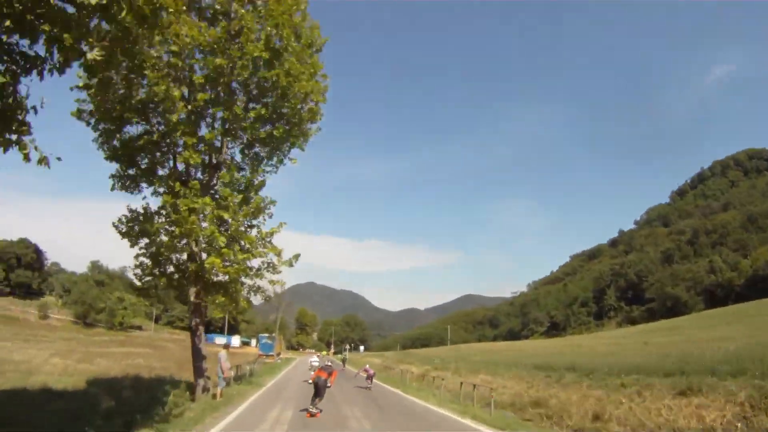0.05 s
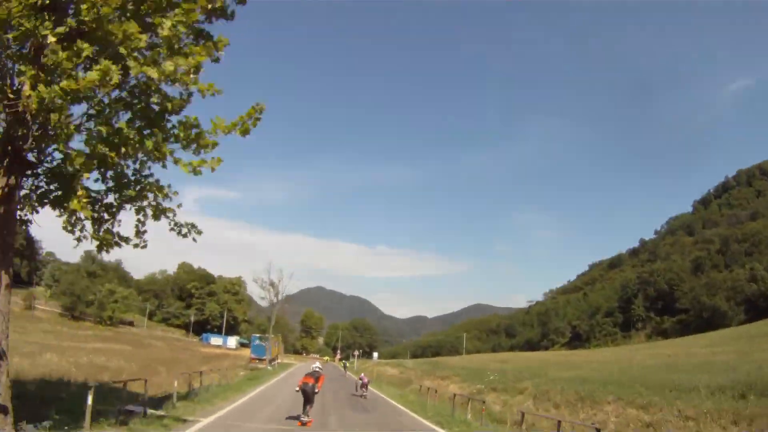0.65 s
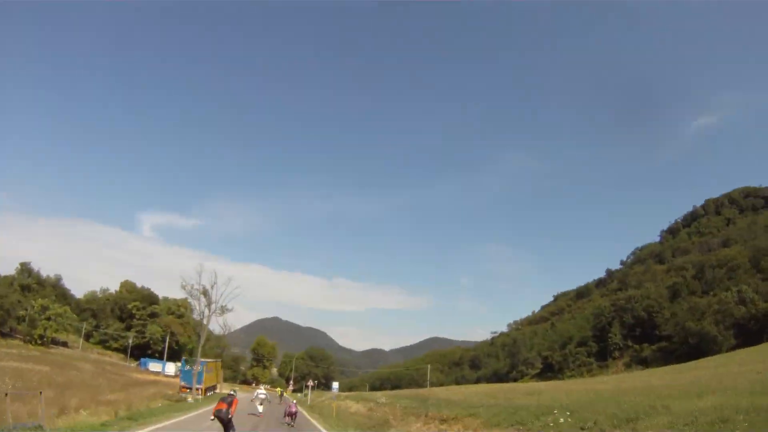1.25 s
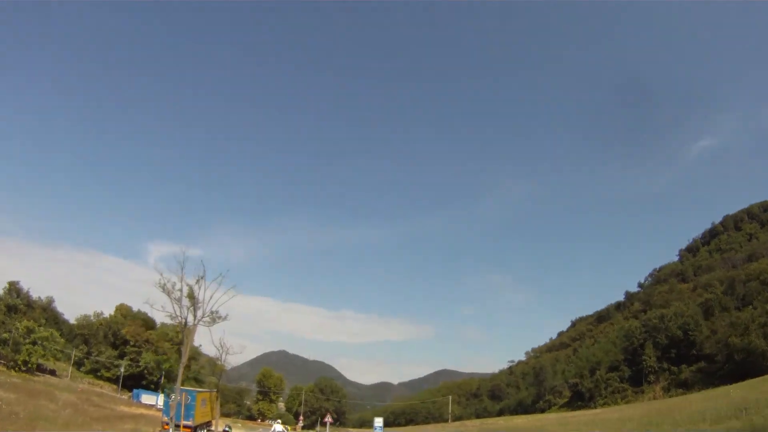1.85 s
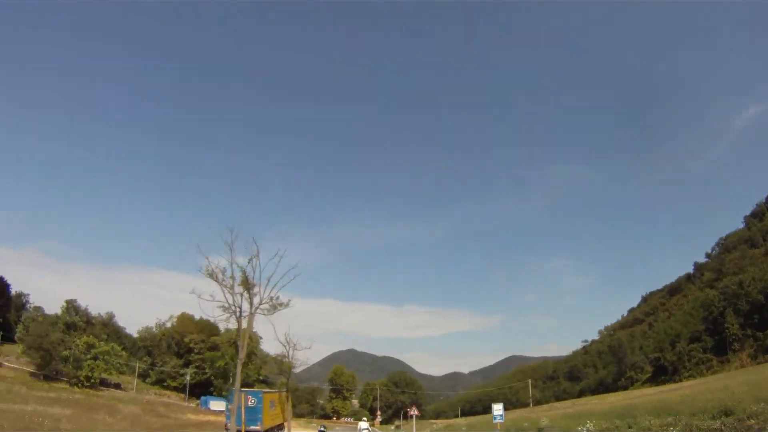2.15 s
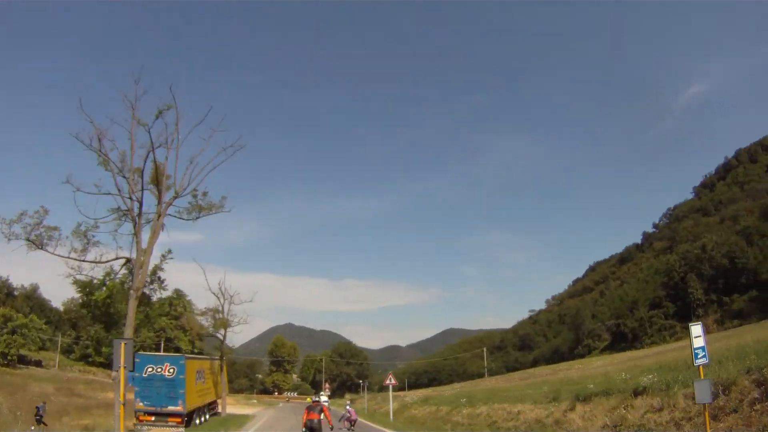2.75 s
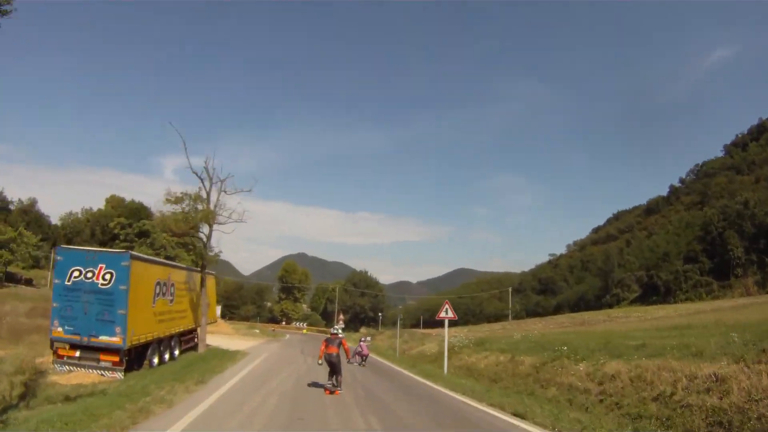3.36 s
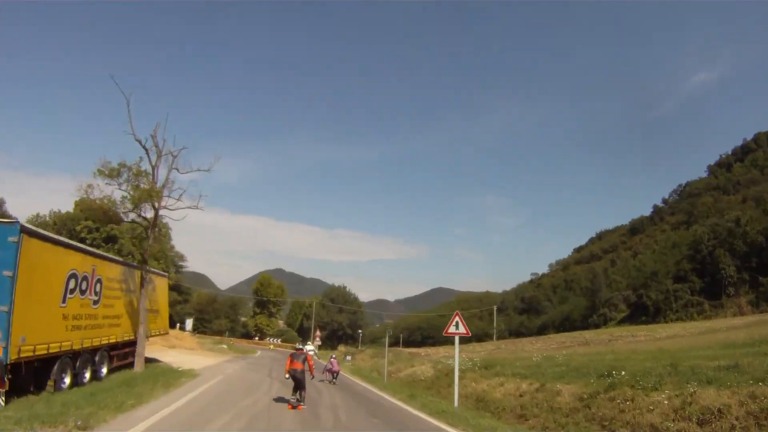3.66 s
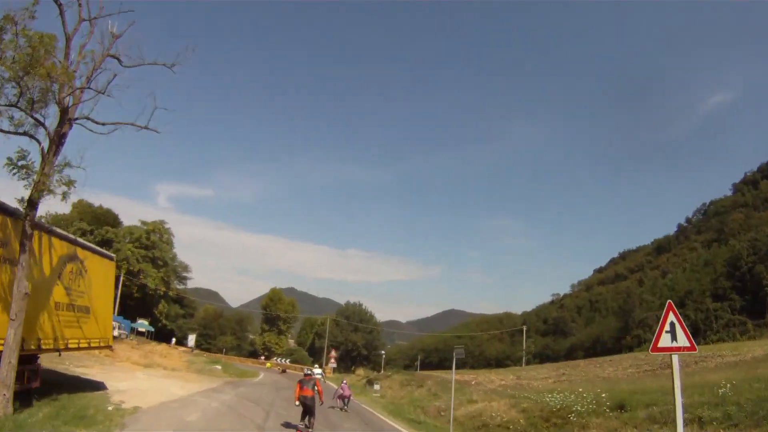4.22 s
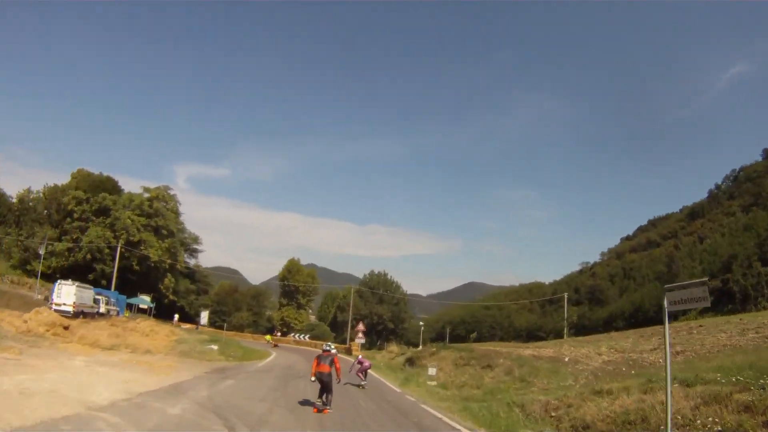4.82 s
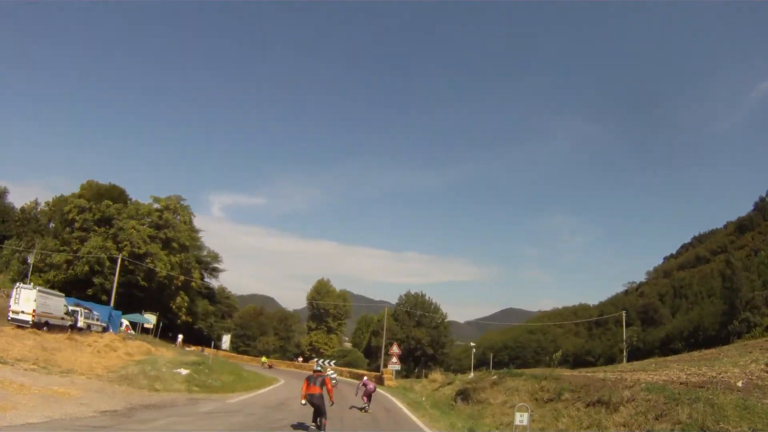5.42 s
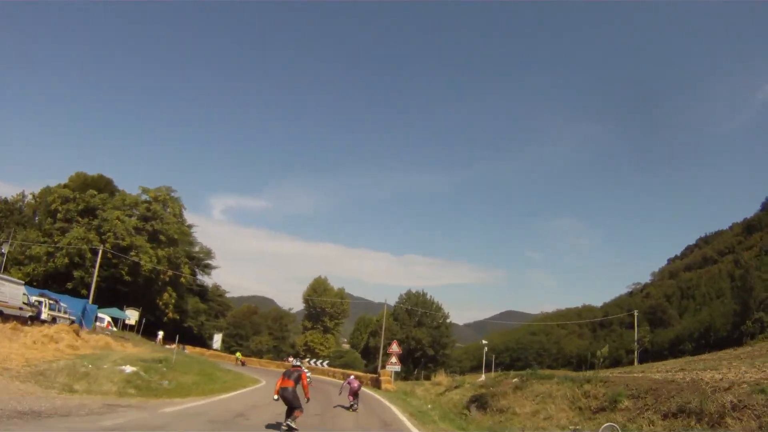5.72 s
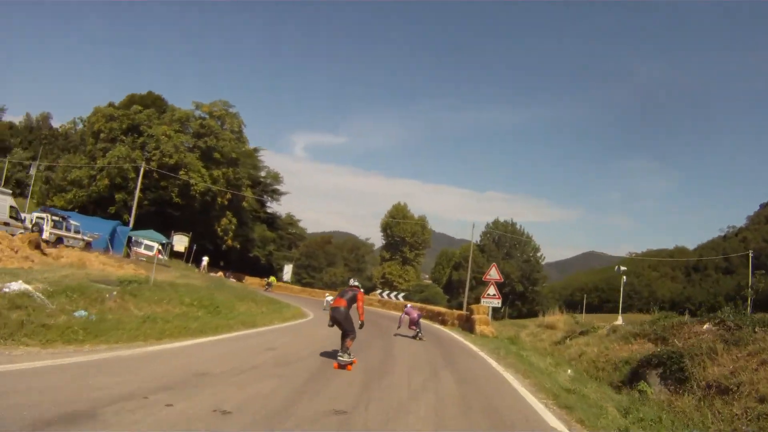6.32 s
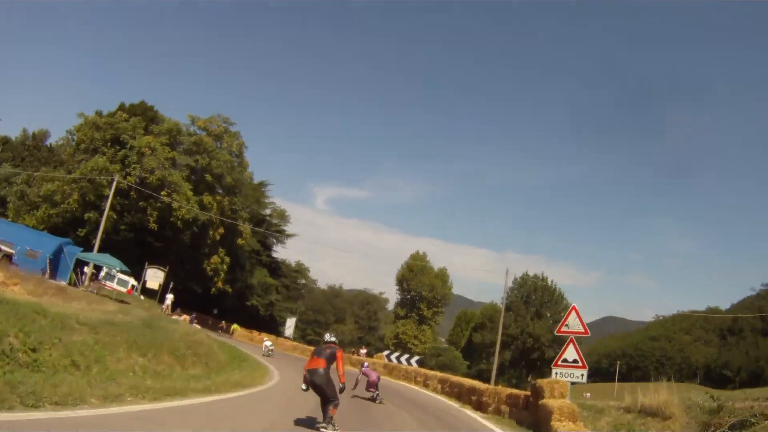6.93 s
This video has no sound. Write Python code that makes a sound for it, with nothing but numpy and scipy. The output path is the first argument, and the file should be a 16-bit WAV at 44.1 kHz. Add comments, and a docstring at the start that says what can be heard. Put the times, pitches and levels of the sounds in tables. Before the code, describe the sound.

Longboard wheels roar and patter down coarse asphalt with rushing wind and a rattling camera case, slowing into a bend.

```python
"""Longboard wheels roar and patter on coarse asphalt, downhill, slowing and scrubbing into a bend.
Road grain and stones ring the case of a camera riding along. Shaken on its mount, the loose case
buzzes in spells and once clacks hard. Wheels and wind hiss through the air; a faint band of wheel
noise sings before the bend. Wind buffet and the jolting ride rumble underneath."""
import sys
import numpy as np
from scipy import signal
from scipy.fft import rfft, irfft, next_fast_len
from scipy.io import wavfile
from scipy.ndimage import map_coordinates

SR = 44100
rng = np.random.default_rng(int(sys.argv[2]) if len(sys.argv) > 2 else 0)


def generate_wav(signal):
    """Clip the signal to [-1, 1] and save it as 16-bit WAV at the path in sys.argv[1]."""
    frames = np.transpose(np.atleast_2d(signal))
    scaled = np.clip(frames, -1, 1) * 32767
    pcm = np.round(scaled).astype(np.int16)
    wavfile.write(sys.argv[1], SR, pcm)


N = 312228

# board speed: t/s, share of top speed
SPEED = [(0, 1), (0.8, 0.8), (1.7, 0.98), (2.5, 0.95), (3.1, 0.89), (3.5, 0.79), (4.2, 0.77), (5.0, 0.58),
         (5.8, 0.49), (6.5, 0.42), (7.08, 0.42)]
# case resonances: f/Hz, width/Hz, lift/dB at ring=1
CASE_MODES = [(759.6, 32, 9), (848, 54, 2.5), (1116, 250, 4), (1358, 164, 4.5), (1608, 128, 7.5),
              (1955, 353, 11), (2377, 357, 11.5), (2898, 132, 9.5), (3480, 810, 6.5), (3729, 166, 11),
              (4240, 375, 8.5), (4806, 370, 6.5), (5180, 280, 4), (6870, 326, 3.5), (7230, 520, 5.5),
              (7757, 330, 10), (8270, 183, 13.5), (8624, 590, 8.5), (9080, 170, 7), (9600, 270, 8.5),
              (10060, 400, 7), (10730, 940, 9.5), (14000, 308, 4), (14392, 214, -1), (14901, 159, 2),
              (15203, 256, -5)]
# camera treble dips: f/Hz, half width/Hz, depth/0-1
TREBLE_DIPS = [(5990, 276, 0.74), (11766, 1380, 0.99)]

# source spectra: f/Hz, relative level/dB
BUFFET_SPECTRUM = [(10, -33), (24, -19), (38, -1.5), (52, -14.5), (80, -18.5), (200, -34), (600, -105)]
RIDE_SPECTRUM = [(35, -17), (65, -5.5), (90, -2), (120, 1.5), (160, 2), (205, -2), (246, 3), (290, -8),
                 (400, -17), (700, -27.5), (2000, -82)]
HISS_SPECTRUM = [(300, -32.5), (700, -16), (1000, -22), (2000, -7.5), (2750, -20), (3550, 0.5), (4400, -23),
                 (5600, -11), (6500, -12), (7600, -29), (8400, -8), (9300, -22), (11000, -14.5),
                 (15200, -24.5)]
SCRUB_SPECTRUM = [(500, -28), (1100, -16), (1450, 3), (1900, 10), (2200, -20), (2900, -21), (5000, -25),
                  (10000, -42)]
CLACK_SPECTRUM = [(150, -33), (550, -14), (1000, -2), (1500, -11), (2500, -2), (4100, 4), (6000, -2.5),
                  (8000, -5), (10500, -17), (15000, -15)]
RATTLE_SPECTRUM = [(200, -25), (650, -24), (1400, 0.5), (2200, -14), (3200, -3.5), (4500, -2.5),
                   (5300, -2.5), (5800, -3.5), (7000, -4.5), (10000, -20), (13500, -15.3), (15200, -6)]
ROAR_SPECTRUM = [(150, -35.5), (330, -4), (650, -10), (900, 0.5), (1400, -0.9), (2200, -14.5), (3200, -11),
                 (5000, -36), (9000, -43)]
GRIT_SPECTRUM = [(200, -35), (330, -24), (650, -15), (900, -5), (1400, 0.5), (2200, -3.5), (3200, -2.5),
                 (4500, -9), (7000, -14), (10000, -11), (13500, -8.5), (15200, -5)]

# wind gusts, road heaves, sideways slips: t/s, half length/s, level/dB
GUSTS = [(0.0, 0.11, -28.5), (0.36, .14, -31), (0.96, 0.13, -32), (1.76, .06, -34), (2.02, 0.087, -32),
         (2.52, 0.065, -32), (3.19, .06, -37), (3.61, 0.066, -28.5), (4.2, 0.15, -41), (4.6, .05, -39),
         (7.07, 0.023, -30)]
HEAVES = [(1.0, 0.46, -42), (1.73, .08, -36), (2.46, 0.29, -33), (3.18, 0.12, -35), (4.08, .08, -37.5),
          (5.1, 0.8, -45.5)]
SCRUBS = [(4.81, 0.03, -42), (5.98, 0.05, -35.5), (6.523, 0.044, -32), (6.66, .05, -36),
          (6.757, 0.046, -33), (6.85, 0.045, -34), (6.99, .044, -37)]
# airborne hiss: t/s, level/dB
HISS_LEVEL = [(0.0, -23.5), (1.0, -27), (1.7, -31), (2.5, -29.5), (4.0, -39.5), (5.2, -33), (6.3, -35),
              (7.08, -35.5)]
# singing band: t/s, f/Hz, level/dB
SING_TRACK = [(4.7, 1200, -60), (5.0, 1156, -42), (5.2, 1112, -45), (5.45, 1065, -45), (5.8, 1045, -42),
              (5.95, 1156, -45), (6.15, 1300, -61)]
# bigger stones: t/s, level/dB
JOLTS = [(0.764, -20), (1.285, -12), (1.322, -13.5), (1.807, -14), (2.301, -19), (2.471, -24), (2.683, -23),
         (3.126, -25), (4.024, -15), (5.028, -22), (6.133, -23)]
# case striking its mount: t/s, relative level/dB, t60/s
CLACK_CONTACTS = [(7.0349, -3, .010), (7.0358, -6, .007), (7.0369, -2, .007), (7.0393, -13, .016)]
# case buzzes, coarser asphalt: t/s, length/s, level/dB, drift/dB
BUZZ_SPELLS = [(0.01, 0.016, -17, -1), (0.06, 0.649, -15.5, -1.9), (0.72, 0.2, -22.5, -6.5),
               (1.218, 0.025, -19.5, 3.5), (1.283, .046, -19, 0.5), (1.345, 0.11, -16, -6.5),
               (1.515, 0.022, -20, 2), (1.675, 0.39, -24, -7), (2.835, 0.45, -25, -3.5),
               (3.27, 0.63, -22, 1.8), (3.87, 0.5, -23, -9.5), (4.942, 0.053, -22.5, -3),
               (5.04, 0.027, -24, -1), (5.955, 0.087, -32, -0.5), (6.085, 0.037, -30, -1),
               (6.255, .045, -29, -4), (6.36, 0.034, -27, -5), (6.49, 0.052, -30.5, -4),
               (6.81, 0.096, -29, -10), (6.96, .065, -31, 1.5)]
COARSE_STRETCHES = [(0.87, .23, -29, -5), (1.66, 0.43, -22.5, -2.5), (2.25, 0.42, -32, -3),
                    (2.83, 0.43, -21.5, -1.5), (3.3, 1.4, -25.5, -5.5), (4.02, 0.07, -22.5, -2),
                    (4.77, 0.037, -26, -1), (4.94, 0.21, -32, 0), (5.93, 0.18, -33, -1),
                    (6.35, .68, -40, 5.5)]

TIME_S = np.arange(N) / SR


def amp(db):
    """Decibels to gain."""
    return 10 ** (np.asarray(db) / 20)


def unit(x):
    """x at rms 1."""
    return x / np.sqrt(np.mean(x ** 2) + 1e-20)


def curves(rows):
    """Per-sample values of each column after t."""
    times_s, *columns = np.transpose(rows)
    return [np.interp(TIME_S, times_s, column) for column in columns]


def wobble(rate_hz):
    """Smooth random curve, rms 1."""
    knots = rng.standard_normal(int(N * rate_hz / SR) + 4)
    return unit(map_coordinates(knots, [TIME_S * rate_hz]))


def at_speed(top_db, doubling_db):
    """Gain: top_db at top speed, doubling_db per doubling of speed."""
    speed, = curves(SPEED)
    return amp(top_db + doubling_db * np.log2(speed))


def swells(rows):
    """Gain of bell-shaped swells."""
    return sum(amp(db) * np.exp(-((TIME_S - peak_s) / half_s) ** 2) for peak_s, half_s, db in rows)


def spells(rows, attack_s, release_s):
    """Gain of spells that rise, drift and die away; overlaps add in power."""
    power = np.zeros(N)
    for start_s, length_s, db, drift_db in rows:
        age_s = TIME_S - start_s
        gate = np.clip(age_s / attack_s, 0, 1) * np.exp(-np.maximum(age_s - length_s, 0) / release_s)
        power += (gate * amp(db + drift_db * np.clip(age_s / length_s, 0, 1))) ** 2
    return np.sqrt(power)


def blow(start_s, db, t60_s):
    """Gain of one blow: instant onset, exponential decay."""
    return (TIME_S >= start_s) * amp(db - 60 * np.maximum(TIME_S - start_s, 0) / t60_s)


def impacts(rate_hz, scatter_db):
    """Tiny blows of random time and size, rms 1."""
    struck = rng.random(N) < rate_hz / SR
    return unit(struck * rng.choice([-1, 1], N) * amp(scatter_db * rng.standard_normal(N)))


def coloured(x, spectrum, ring=0):
    """Minimum-phase filter: spectrum plus case resonances scaled by ring; output rms 1."""
    n_fft = 2 * next_fast_len(N // 2 + 8192)
    hz = np.fft.rfftfreq(n_fft, 1 / SR)
    points_hz, points_db = np.transpose(spectrum)
    source_db = np.interp(np.log(hz + 1), np.log(points_hz), points_db)
    case_db = sum(db / (1 + (2 * (hz - mode_hz) / width_hz) ** 2) for mode_hz, width_hz, db in CASE_MODES)
    gain = np.maximum(amp(source_db + ring * case_db), 1e-6)
    cepstrum = irfft(np.log(gain), n_fft)
    cepstrum[1:n_fft // 2] *= 2
    cepstrum[n_fft // 2 + 1:] = 0
    return unit(irfft(rfft(x, n_fft) * np.exp(rfft(cepstrum)), n_fft)[:N])


def wind(crest=3.3):
    """Eddies buffet the camera, harder at speed and in gusts."""
    eddies = signal.hilbert(coloured(rng.standard_normal(N), BUFFET_SPECTRUM))
    buffet = unit(eddies.real / np.hypot(1, np.abs(eddies) / crest))  # steady headwind: similar eddies
    return np.hypot(at_speed(top_db=-38, doubling_db=2.9), swells(GUSTS)) * buffet


def ride():
    """The ride drums through the camera, harder at speed and on uneven road."""
    rumble = coloured(rng.standard_normal(N), RIDE_SPECTRUM)
    return np.hypot(at_speed(top_db=-35, doubling_db=7.7), swells(HEAVES)) * rumble


def hiss(flutter_db=2.0):
    """Airborne wheel and wind noise; hardly rings the case."""
    level_db, = curves(HISS_LEVEL)
    envelope = amp(level_db + flutter_db * wobble(60))
    return envelope * coloured(rng.standard_normal(N), HISS_SPECTRUM, ring=0.28)


def sing(width_hz=90):
    """A narrow band of wheel noise sinks in pitch, then rises."""
    hz, level_db = curves(SING_TRACK)
    phase = 2 * np.pi * np.cumsum(hz) / SR
    return amp(level_db) * unit(wobble(width_hz) * np.cos(phase) + wobble(width_hz) * np.sin(phase))


def scrub(rasp_db=2.0):
    """Wheels slip sideways and rasp on the road."""
    friction = rng.standard_normal(N) * amp(rasp_db * wobble(200))
    return swells(SCRUBS) * coloured(friction, SCRUB_SPECTRUM, ring=0.4)


def jolts(t60_s=0.022):
    """Each bigger stone briefly shakes the case."""
    envelope = sum(blow(start_s, db, t60_s) for start_s, db in JOLTS)
    return envelope * coloured(rng.standard_normal(N), RATTLE_SPECTRUM, ring=1)


def clack(gain_db=-2):
    """The case strikes its mount and bounces within milliseconds."""
    envelope = sum(blow(*contact) for contact in CLACK_CONTACTS)
    return amp(gain_db) * envelope * coloured(rng.standard_normal(N), CLACK_SPECTRUM)


def rattle(rest_db=-40.5, clump_db=2.0, sway_db=1.03, play=2):
    """The loose case chatters on its mount in clumps of contacts; between spells it only trembles."""
    envelope = np.hypot(amp(rest_db), spells(BUZZ_SPELLS, attack_s=0.012, release_s=0.013))
    contacts = impacts(rate_hz=6000, scatter_db=1.0) + rng.standard_normal(N)  # hits + scrape
    shaking = amp(clump_db * wobble(260) + sway_db * wobble(70))
    travel = np.tanh(shaking / play)  # the mount bounds the hardest swings
    return envelope * coloured(contacts * travel, RATTLE_SPECTRUM, ring=1.18)


def wheels(roar_flutter_db=0.48, grit_flutter_db=1, patch_db=1.0):
    """Wheels roar on the road's grain; stones tap through the mount, harder on coarse asphalt."""
    grip = wobble(70)  # flutters as the board shakes
    grain = rng.standard_normal(N) * amp(roar_flutter_db * grip)
    roar = coloured(grain, ROAR_SPECTRUM, ring=0.91)
    stones = impacts(rate_hz=6000, scatter_db=3.0) + rng.standard_normal(N)  # taps + hiss
    stones *= amp(grit_flutter_db * grip - patch_db * wobble(16))
    grit = coloured(stones, GRIT_SPECTRUM, ring=0.88)
    coarse = spells(COARSE_STRETCHES, attack_s=0.03, release_s=0.04)
    roar_gain = at_speed(top_db=-25.5, doubling_db=11.4)
    grit_gain = np.hypot(at_speed(top_db=-25.5, doubling_db=8.5), coarse)
    return roar_gain * roar + grit_gain * grit


def scene():
    """Sum at one microphone, open air."""
    return (wheels() + hiss() + scrub() + rattle() + jolts() + sing() + clack() + wind() + ride())[None]


def record(dry):
    """Camera: full-scale ceiling, two treble dips, band limit."""
    n_fft = next_fast_len(N + SR // 2)
    hz = np.fft.rfftfreq(n_fft, 1 / SR)
    top_hz = 15330
    response = np.where(hz < top_hz, 1.0, 0.0)
    for dip_hz, half_hz, depth in TREBLE_DIPS:
        response *= 1 - depth * np.exp(-((hz - dip_hz) / half_hz) ** 2)
    return irfft(rfft(np.clip(dry, -1, 1), n_fft) * response, n_fft)[..., :N]


dry = scene()
out = record(dry)
generate_wav(out)
```